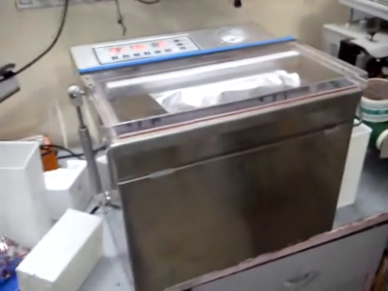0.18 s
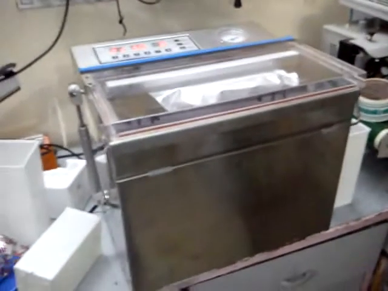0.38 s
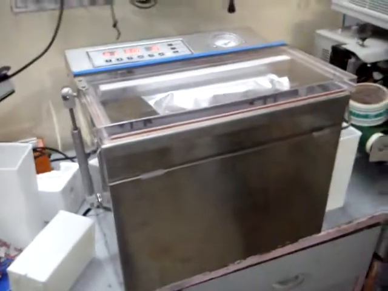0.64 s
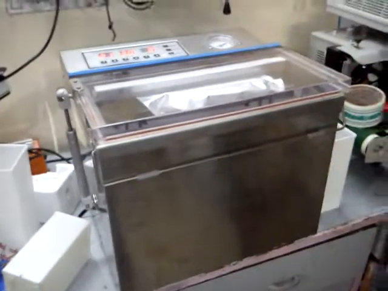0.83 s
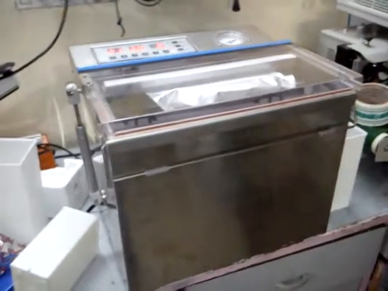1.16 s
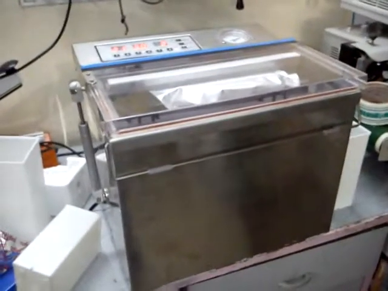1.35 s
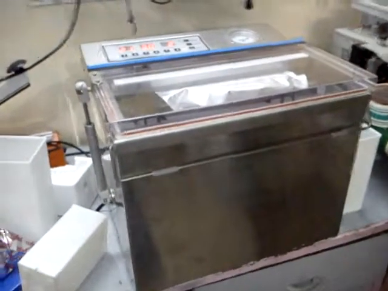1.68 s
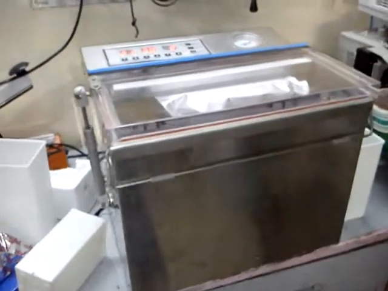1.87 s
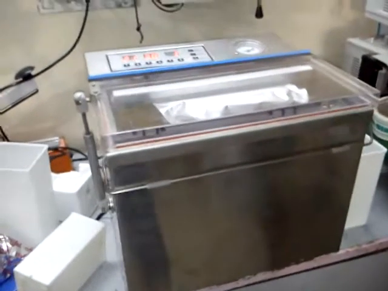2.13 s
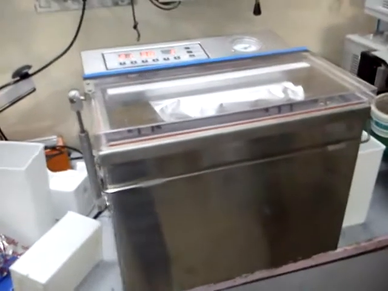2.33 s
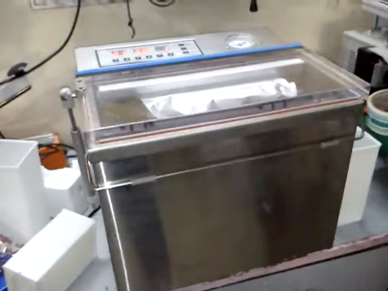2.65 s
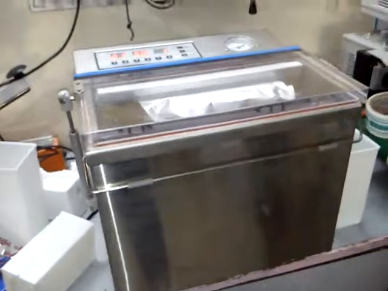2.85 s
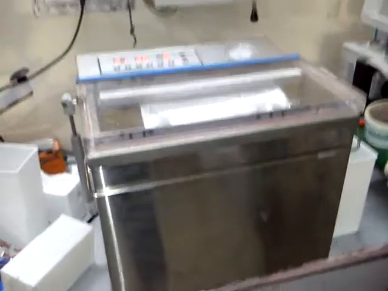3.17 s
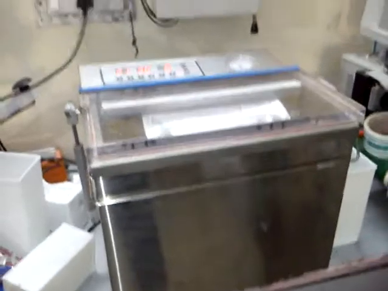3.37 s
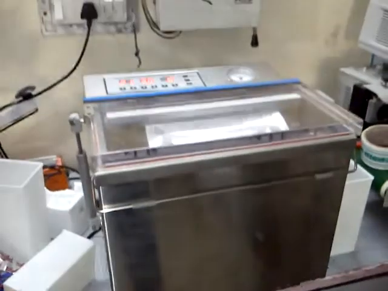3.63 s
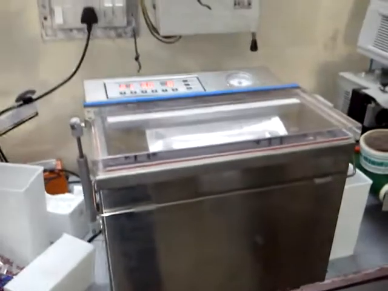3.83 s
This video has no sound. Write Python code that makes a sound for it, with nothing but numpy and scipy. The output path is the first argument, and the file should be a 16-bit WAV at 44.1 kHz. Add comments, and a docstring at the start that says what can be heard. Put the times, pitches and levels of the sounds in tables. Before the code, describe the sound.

Air rushes into a vacuum sealing machine after quiet hum and a sharp metallic clack.

```python
"""Vacuum sealer in a workshop

A tabletop sealer, close by. Its solenoid valve pulls in with a clack that shakes the steel
cabinet. Air then rushes through valve and pipe, hissing in their resonances; the colour of
the hiss drifts as the chamber fills. Behind it: ventilation, motor and mains hum, faint rustles."""
import sys
import numpy as np
from scipy import signal
from scipy.fft import rfft, irfft
from scipy.io import wavfile
from scipy.ndimage import uniform_filter1d

SR = 44100
rng = np.random.default_rng(int(sys.argv[2]) if len(sys.argv) > 2 else 0)


def store_pcm(level_fs):
    """Save levels as 16-bit WAV."""
    pcm = np.round(np.clip(level_fs, -1, 1) * 32767).astype(np.int16)
    wavfile.write(sys.argv[1], SR, np.atleast_2d(pcm).T)


N = 176400
OPEN_S = 2.912  # air starts to flow


def valve():
    """The coil tugs, the plunger cracks home and rebounds, the cabinet rings."""
    # plunger strike, seating, rebounds: t/s, crack gain/dB, thud gain/dB
    blows = [(2.9072, 0, 0), (2.9101, -1, -7), (2.916, -11, -7), (2.9314, -14, -10.5)]
    # crack spectrum: f/Hz, relative level/dB
    crack_shape = [(100, -14), (400, -10), (850, 2), (1400, -5.5), (2200, -5), (3700, -5.5), (5200, -14.5),
                   (7500, -11), (11500, -32), (14500, -15), (16000, -17)]
    # cabinet modes: f/Hz, level/dB, T60/s
    cabinet = [(112, -39, .39), (143, -23, .04), (161, -27, .32), (206, -39, .33), (232, -35, .11),
               (262, -32, .18), (320, -37, .14), (376, -40, .23), (510, -30, .15), (577, -32, .27),
               (807, -28, .16), (925, -25, .07), (1210, -28, .2), (1335, -37, .12)]
    # diffuse ring of panels and room: f/Hz, relative level/dB
    ring_shape = [(40, -32), (85, -16), (140, -1), (240, -2), (420, -7.5), (600, -2), (800, -6),
                  (1050, -13.5), (2000, -2), (4000, -11), (7000, -18.5), (15000, -26)]
    # its decay: f/Hz, T60/s
    ring_t60 = [(100, 0.79), (300, 0.87), (700, 0.63), (2000, 0.44), (6000, 0.36), (15000, 0.14)]
    crack_db, crack_t60_s = -20, 0.028
    ring_db, ring_rise_s = -27, 0.0054
    tug_hz, tug_db, scrape_db, tug_half_s = 130, -25, -37, 0.017
    t, out = np.arange(N) / SR, np.zeros(N)
    strike_s = blows[0][0]
    thud = sum((-1) ** (k + 1) * amp(db - 60 * t / t60) * np.sin(2 * np.pi * hz * t)
               for k, (hz, db, t60) in enumerate(cabinet))
    for s, crack_gain_db, thud_gain_db in blows:
        crack = amp(crack_db + crack_gain_db - 60 * t / crack_t60_s) * coloured(crack_shape)
        add(out, s, crack + amp(thud_gain_db) * thud)
    ring = shaped(coloured(ring_shape), lambda f, s: -60 * s / read(ring_t60, f))
    add(out, strike_s, amp(ring_db) * ring * (1 - np.exp(-t / ring_rise_s)))
    tug = amp(tug_db) * np.sin(2 * np.pi * tug_hz * (strike_s - t))
    scrape = amp(scrape_db) * coloured(ring_shape)
    around_strike = np.maximum(1 - abs(t - strike_s) / tug_half_s, 0) ** 2
    return out + (tug + scrape) * around_strike


def air_rush():
    """A fluttering turbulent jet, coloured by pipe and chamber. Stereo."""
    # jet spectrum: f/Hz, relative level/dB
    jet_shape = [(150, -12), (480, -21), (700, -4), (1000, -4), (1480, -2), (1800, 1.5), (2250, 0.5),
                 (2540, -3.5), (2900, -2.5), (3800, 3), (4700, -5.5), (5100, -9.5), (5900, -7.5),
                 (6550, -17), (7300, -13), (8300, -12.5), (9500, -13.5), (10300, -25), (11200, -26),
                 (11900, -8), (12900, -11.5), (14200, -20), (15700, -23)]
    # pipe and chamber resonances: f/Hz, width/Hz, peak/dB
    pipe = [(705, 40, 14), (915, 25, 4), (1245, 40, 9), (1290, 25, 5), (1335, 20, 7), (1585, 22, 6),
            (1690, 35, 6), (1765, 60, 11), (1865, 60, 9), (1912, 50, 11), (1990, 35, 6), (2325, 40, 8),
            (2740, 32, 9), (2880, 38, 9), (3015, 22, 7), (3148, 28, 9), (3285, 35, 9), (3338, 25, 9),
            (3580, 80, 7), (4215, 55, 8), (4525, 35, 12), (5260, 45, 7)]
    # many small resonances between them: f/Hz, depth/dB
    ripple_depth = [(600, 1.0), (4600, 1.6), (5600, 4), (12000, 5.5)]
    # overall gain of the rush: t/s, gain/dB
    flow = [(2.92, -1), (3.15, -0.2), (3.3, -2.5), (3.42, -2), (3.7, -3.95), (3.9, -5.75), (4, -6.5)]
    # band gains climb as the chamber fills, offsetting the fall in flow: f/Hz, rate/(dB/s)
    climb = [(600, 3.5), (1900, 6.5), (3200, 3.5), (8000, 5.5), (13000, 3)]
    base_db, rise_s, ripple_step_hz = -35.5, 0.0083, 42
    flutter_db, flutter_hz = 0.52, 110
    side_db, side_above_hz = -24, 3500
    t, hz = np.arange(N) / SR, np.fft.rfftfreq(N, 1 / SR)
    pipe_power = 1 + sum(amp(db) ** 2 / (1 + (2 * (hz - f) / width) ** 2) ** 1.82
                         for f, width, db in pipe)
    ripple = np.interp(hz / ripple_step_hz, np.arange(len(hz)), rng.standard_normal(len(hz)))
    colour = np.sqrt(pipe_power) * amp(read(jet_shape, hz) + read(ripple_depth, hz) * ripple)
    jet = shaped(noise(lambda f: colour),
                 lambda f, s: eddies_db(f, s) + read(climb, f) * np.maximum(s - OPEN_S, 0))
    side = amp(side_db) * noise(lambda f: colour * (f > side_above_hz)) * np.array([[1], [-1]])
    opening = np.clip((t - OPEN_S) / rise_s, 0, 1)
    gain_db = base_db + np.interp(t, *np.transpose(flow)) + flutter_db * band(0, flutter_hz)
    return (jet + side) * opening * amp(gain_db)


def ventilation():
    """Low, eddying air noise; sinks slightly until the valve opens."""
    # ventilation spectrum: f/Hz, relative level/dB
    vent_shape = [(15, 10), (30, -4.5), (55, 5.5), (75, -3.5), (130, -1), (220, -0.5), (380, 1), (600, -1),
                  (720, -4), (1200, -3), (1650, -6.5), (2500, -13.5), (3800, -18), (5100, -28),
                  (5900, -27.5), (7000, -30.5), (10800, -35.5), (15500, -38)]
    level_db, fall_db_per_s = -50, 0.5
    t = np.arange(N) / SR
    vent = shaped(coloured(vent_shape), eddies_db)
    return vent * amp(level_db - fall_db_per_s * (np.minimum(t, OPEN_S) - OPEN_S / 2))


def hum():
    """Motor and mains tones, each wavering in pitch, swelling together."""
    # tones: f/Hz, rms waver/Hz, level/dB
    tones = [(39.4, 2.8, -61), (53.2, 3.78, -63), (101.3, 1.6, -61), (201, 1.95, -71), (296, 2.7, -78),
             (374.4, 6, -72.5), (648.5, 5.5, -69)]
    # slow swell: t/s, gain/dB
    swell = [(0, -0.5), (.9, 2), (1.3, -1.5), (2.4, -1.5), (3.1, -1), (3.7, 2.5)]
    waver_rate_hz = 4.96
    t, out = np.arange(N) / SR, np.zeros(N)
    for hz, waver_hz, db in tones:
        turns = np.cumsum(hz + waver_hz * band(0, waver_rate_hz)) / SR
        out += amp(db) * unit(np.sin(2 * np.pi * turns))
    return out * amp(np.interp(t, *np.transpose(swell)))


def rustles():
    """Faint handling: brief puffs of high noise."""
    # puffs: t/s, half-length/s, f/Hz, half-width/Hz, level/dB
    puffs = [(.4, .006, 7300, 1800, -66), (1.6, .03, 6000, 8500, -70)]
    t = np.arange(N) / SR
    return sum(amp(db) * band(hz, width_hz) * np.exp(-((t - s) / half_s) ** 2)
               for s, half_s, hz, width_hz, db in puffs)


def amp(db):
    """dB to gain."""
    return 10 ** (np.asarray(db) / 20)


def unit(x):
    """Scales to rms 1."""
    return x / np.sqrt(np.mean(x ** 2) + 1e-20)


def read(points, hz):
    """Interpolates a table over log frequency."""
    f, value = np.transpose(points)
    return np.interp(np.log(hz + 1), np.log(f + 1), value)


def add(mix, s, sound):
    """Mixes a sound in at time s."""
    part = mix[round(s * SR):][:len(sound)]
    part += sound[:len(part)]


def noise(gain):
    """Noise of rms 1 with spectrum gain(f/Hz)."""
    return unit(irfft(rfft(rng.standard_normal(N)) * gain(np.fft.rfftfreq(N, 1 / SR)), N))


def coloured(shape):
    """Noise of rms 1 from a table of f/Hz, level/dB."""
    return noise(lambda f: amp(read(shape, f)))


def band(hz, width_hz):
    """Noise of rms 1 in a Gaussian band."""
    return noise(lambda f: np.exp(-((f - hz) / width_hz) ** 2))


def shaped(x, field_db):
    """Applies the gain field_db(f/Hz, t/s)."""
    frames = dict(fs=SR, nperseg=512, noverlap=384)
    hz, t, z = signal.stft(x, **frames)
    return signal.istft(z * amp(field_db(hz[:, None], t[None])), **frames)[1][:len(x)]


def eddies_db(hz, t):
    """Random gain patches, 1 dB rms, about 500 Hz by 35 ms."""
    cells = rng.standard_normal((hz.size, t.size))
    return unit(uniform_filter1d(uniform_filter1d(cells, size=6, axis=0), size=12, axis=1))


def scene():
    """Sealer and workshop, nearly all centred."""
    return valve() + air_rush() + ventilation() + hum() + rustles()


def record(dry):
    """Low-pass at 15.8 kHz."""
    lowpass = signal.firwin(601, 15800, window=("kaiser", 9), fs=SR)
    return signal.oaconvolve(dry, lowpass[None], "same")


dry = scene()
out = record(dry)
store_pcm(out)
```